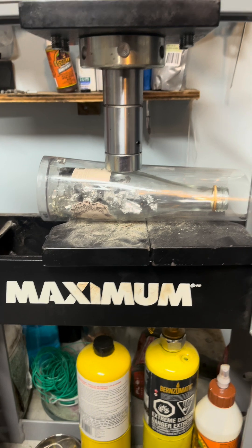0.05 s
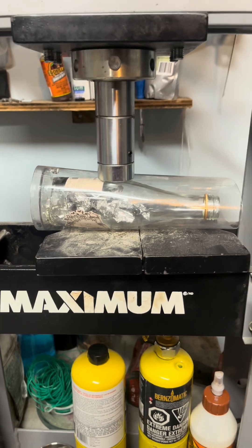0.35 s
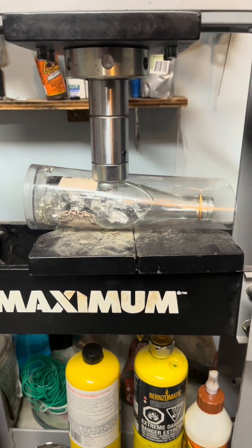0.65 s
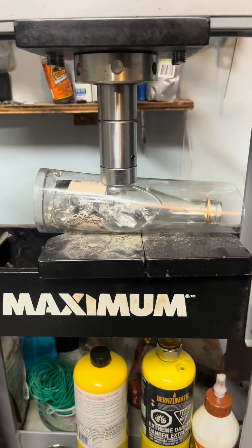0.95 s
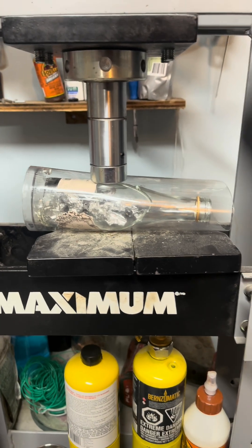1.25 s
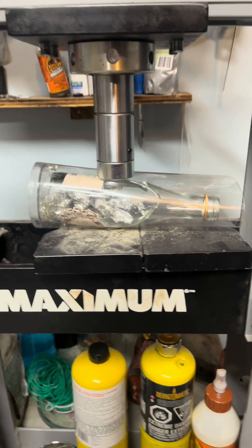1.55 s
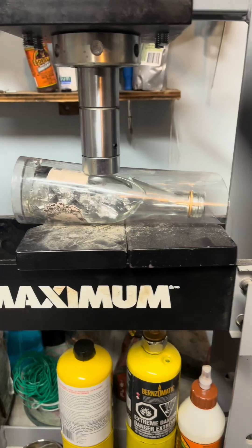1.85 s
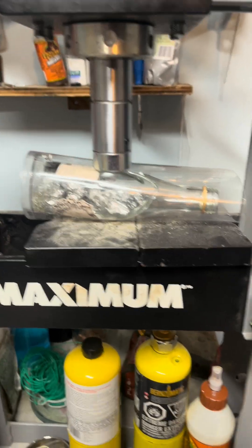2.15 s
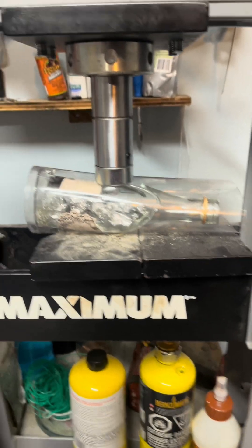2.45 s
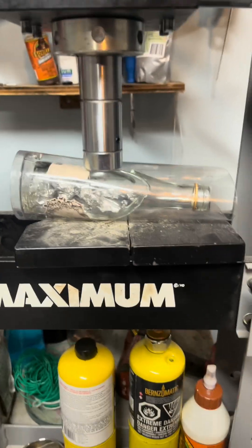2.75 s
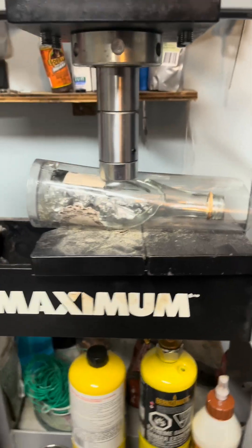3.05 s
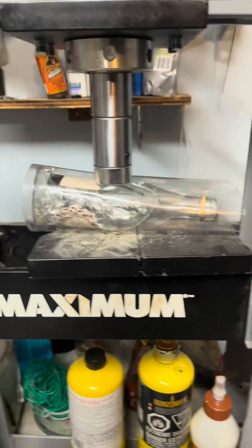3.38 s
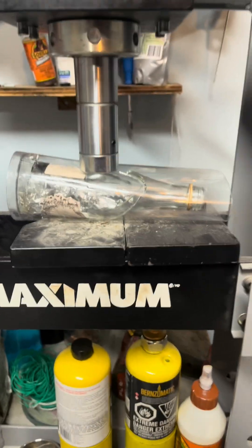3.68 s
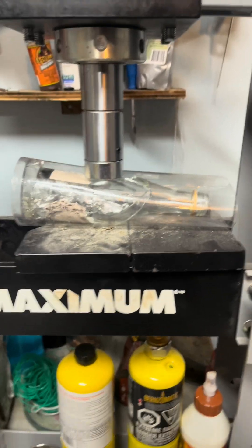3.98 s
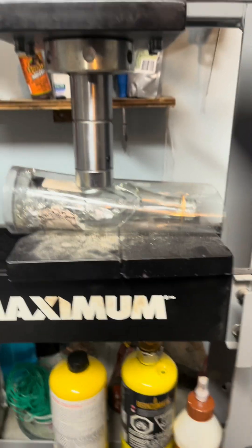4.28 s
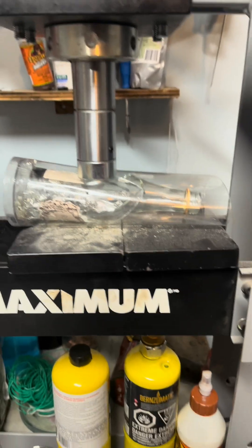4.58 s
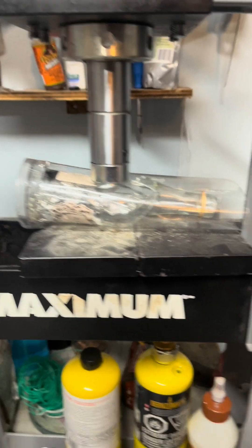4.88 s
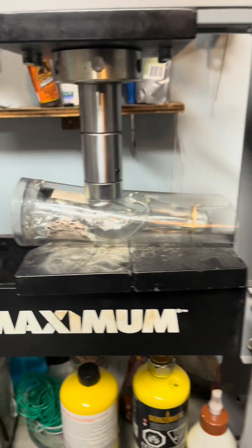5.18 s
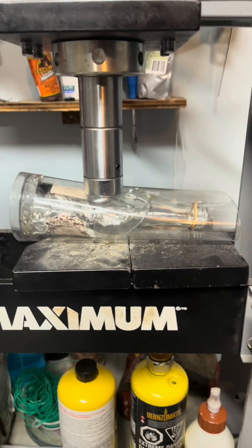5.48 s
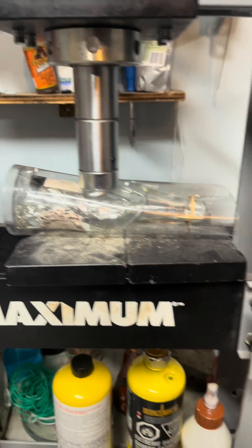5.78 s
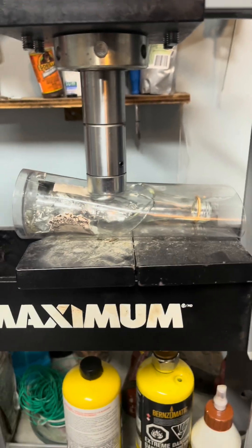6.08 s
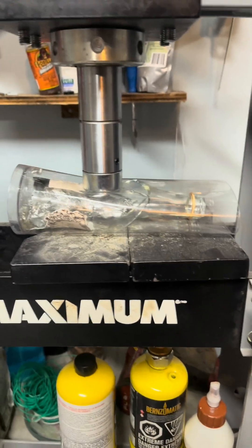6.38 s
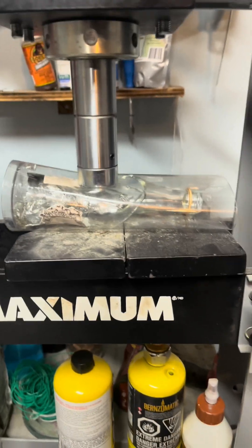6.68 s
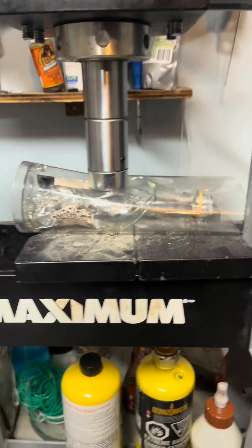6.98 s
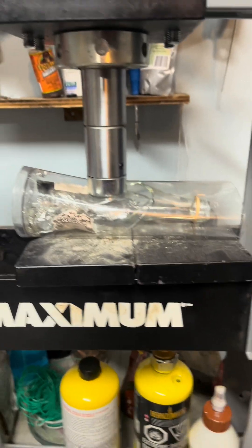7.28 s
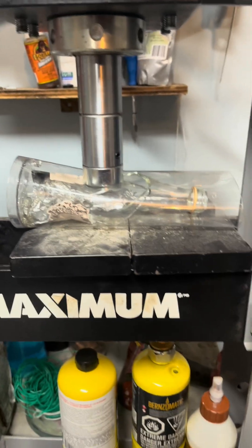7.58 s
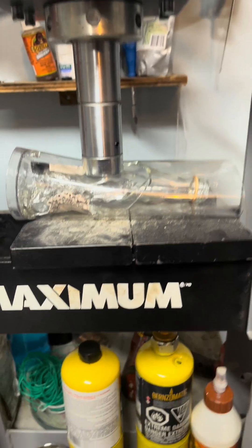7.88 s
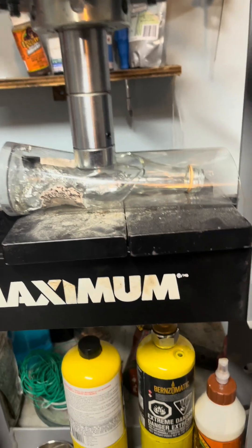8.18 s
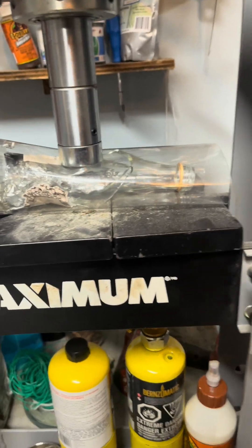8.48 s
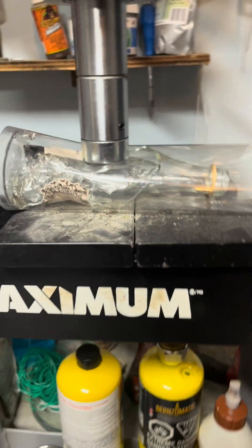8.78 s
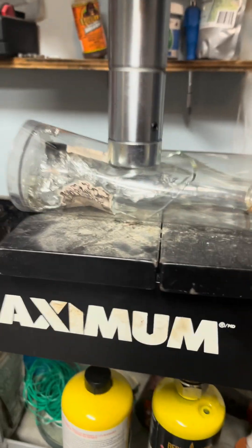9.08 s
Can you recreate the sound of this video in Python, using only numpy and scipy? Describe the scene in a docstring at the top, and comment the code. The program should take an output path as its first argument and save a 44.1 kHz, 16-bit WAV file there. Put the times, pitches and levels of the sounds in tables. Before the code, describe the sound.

A hand-pumped hydraulic press bears down on a glass bottle, close to the microphone in a small workshop with a faint rumble and hum. Sharp glass cracks and gritty grinding start at about 0.3 seconds, strongest in the first two seconds. The pumping settles into about two strokes a second, each a short hoarse squeak, a rattling knock of the frame and a bright clink of the steel handle. Smaller cracks continue throughout. Around 3.7 seconds the glass gives a sinking squeak, with loud dull knocks and a snap. From about 6.8 seconds it creaks under the load, and the pumping dies away after 7.2. Following a quieter moment, the glass rasps and squeals against the ram at 8.4 seconds, then gives way at 8.6 with a loud crunch. Shards ring briefly, the frame shudders, and a few soft knocks follow around 9 seconds.

```python
"""Bottle in a shop press

A small workshop, a phone microphone close to a hand-pumped hydraulic press bearing down on a bottle.
Strokes knock the steel frame and the handle clinks on its stop, over bench rumble and faint hum.
The glass cracks and grinds, creaks under the rising load, squeals on the ram and gives with a crunch."""
import sys
import numpy as np
from scipy import signal
from scipy.fft import rfft, irfft, next_fast_len
from scipy.io import wavfile
from scipy.ndimage import map_coordinates

SR = 44100
rng = np.random.default_rng(int(sys.argv[2]) if len(sys.argv) > 2 else 0)


def file_out(sig):
    """Save sig as 16-bit WAV at sys.argv[1]."""
    # one column per channel
    cols = np.atleast_2d(sig).T
    # limit, then scale
    lim = np.clip(cols, -1, 1)
    pcm = np.round(lim * 32767).astype(np.int16)
    wavfile.write(sys.argv[1], SR, pcm)


N = 407484
T = np.arange(SR // 2) / SR  # seconds within one event
CLOCK = np.arange(N) / SR  # seconds within the scene

# jolts to the frame, from the pump or the glass giving: start_s, knock_db, rattle_db, thud_db, sway_db
JOLTS = [(0.0, -61, -48.5, -45, -64.5), (0.334, -50.5, -32, -42.5, -63.5), (0.594, -52, -47, -44, -46),
         (0.79, -48.5, -44, -37, -53.5), (1.251, -46, -31.5, -42, -52), (1.786, -41.5, -26.5, -37.5, -66),
         (1.896, -42.5, -21.5, -35, -74), (2.28, -41.5, -26, -37, -50), (2.748, -40.5, -25, -36, -49),
         (3.22, -40.5, -26, -36, -49), (3.694, -39.5, -28.5, -34, -45), (4.144, -39, -28.5, -38, -48),
         (4.573, -40.5, -32, -35.5, -48.5), (5.013, -41, -27.5, -38, -45), (5.441, -38, -24, -35, -51),
         (5.857, -40.5, -21, -38, -47), (6.286, -41, -24.5, -33.5, -49), (6.713, -38, -26.5, -36.5, -39),
         (7.161, -42, -27.5, -34, -55), (7.364, -48.5, -34, -52, -73), (7.931, -49, -33, -40, -63)]
# the lever takes up its slack before a stroke: start_s, squeak_db, tick_db
LEVER_TAKEUPS = [(0.138, -53, -80.5), (0.259, -43, -49.5), (1.204, -46, -50.5), (1.743, -40, -55),
                 (2.235, -37.5, -55), (2.706, -35, -62), (3.182, -37.5, -42.5), (4.105, -37.5, -47),
                 (4.546, -34, -30), (4.974, -34, -40), (5.401, -37.5, -66), (5.82, -37, -39),
                 (6.247, -36, -39.5), (6.672, -34.5, -39), (7.12, -34, -39), (7.905, -45.5, -58)]
# the handle meets its stop: start_s, ring_db, snap_db, hold_s
HANDLE_CLINKS = [(0.8705, -26.5, -58, 0.0082), (1.49, -28.5, -42, 0.026), (2.4717, -21.5, -35, 0.011),
                 (2.9412, -28, -31, 0.022), (3.401, -23, -27.5, 0.0096), (3.8808, -24.5, -50.5, 0.012),
                 (4.3207, -26, -28.5, 0.014), (4.7427, -25.5, -36.5, 0.019), (5.171, -22, -61, 0.0048),
                 (5.5978, -22.5, -33, 0.011), (6.0286, -28, -32, 0.014), (6.4545, -25.5, -29.5, 0.016),
                 (6.8732, -24, -47.5, 0.0092)]
# evenly spaced dull knocks: first_s, last_s, count, first_db, last_db, pitch_hz
KNOCK_RUNS = [(0.005, 0.238, 3, -35, -50, 257), (3.704, 3.726, 2, -15.5, -21, 320),
              (3.716, 3.716, 1, -21, -21, 173), (3.82, 3.834, 2, -28, -34, 495),
              (3.857, 3.936, 4, -24, -34, 478), (7.582, 7.797, 3, -37.5, -39, 209),
              (7.881, 7.881, 1, -48, -48, 236), (8.059, 8.147, 2, -42, -48, 230),
              (8.982, 9.18, 5, -38, -32.5, 252)]
# spells of grinding as the ram advances: start_s, length_s, grit_db, fizz_db
GRIND_SPELLS = [(0.0, 0.011, -50.5, -75), (0.295, .04, -55.5, -65), (0.504, 0.15, -34, -35),
                (0.734, 0.037, -33, -51), (1.26, 0.16, -44, -41.5), (1.466, 0.029, -47, -45),
                (1.87, 0.1, -39, -46), (2.281, 0.13, -44, -44), (2.747, 0.11, -40.5, -51),
                (3.24, 0.14, -47.5, -54), (3.513, 0.171, -49.5, -60), (3.69, .105, -31, -47.5),
                (4.18, 0.12, -45.5, -45), (4.577, 0.23, -47, -52), (5.03, 0.17, -43, -47.5),
                (5.46, 0.093, -38.5, -40), (5.905, 0.14, -40, -50.5), (6.289, .13, -37.5, -35.5),
                (6.75, 0.14, -35, -39.5), (7.14, .18, -42, -46), (7.93, .11, -46, -51),
                (8.52, 0.12, -32.5, -38), (8.649, 0.15, -38.5, -56), (9.034, 0.23, -56, -65)]
# the course of one squeak of glass on steel: time_s, level_db, pitch_hz
DRAG_PATH = [(3.28, -56, 2120), (3.399, -39.5, 1980), (3.46, -53, 2000), (3.55, -48, 1990),
             (3.66, -38.5, 1960), (3.699, -30.5, 1900), (3.735, -33, 1850), (3.776, -25, 1780),
             (3.839, -56, 1420)]
# the glass creaks under load: start_s, length_s, rasp_db, squeal_db
CREAK_SPELLS = [(6.794, 0.037, -17.5, -31), (6.873, 0.042, -30.5, -44), (6.987, 0.015, -26.5, -33),
                (7.161, 0.14, -26.5, -38), (7.679, .09, -52.5, -59), (7.942, 0.093, -33, -48),
                (8.412, .205, -26.5, -35)]
# the glass slips on the ram: centre_s, peak_db, half_length_s
RAM_SLIPS = [(8.437, -23, 0.0028), (8.468, -19, 0.0036), (8.485, -15, 0.0034), (8.498, -21.5, 0.0066),
             (8.514, -31, 0.0047), (8.544, -14.5, 0.0067), (8.592, -15, 0.0051), (8.616, -14, 0.0036)]
# the clearest cracks of the loaded glass: start_s, body_db, treble_db, t60_s
GLASS_CRACKS = [(0.336, -25.5, -33, .035), (0.37, -34, -33.5, 0.054), (0.464, -38, -40, 0.09),
                (0.5015, -16.5, -17, .07), (0.592, -16, -17.5, 0.059), (0.697, -19, -27, .1),
                (0.714, -29.5, -32, 0.13), (0.739, -25.5, -41, 0.057), (0.757, -19.5, -61, .075),
                (0.846, -23, -33.5, 0.078), (0.912, -33.5, -40, 0.11), (1.034, -43.5, -53, .065),
                (1.073, -45.5, -51, 0.14), (1.138, -42, -46.5, .06), (1.227, -32.5, -38.5, 0.2),
                (1.287, -21, -27, 0.085), (1.313, -30, -34, .1), (1.337, -33, -34, .065),
                (1.39, -44, -34.5, .12), (1.419, -27, -30, 0.055), (1.657, -57, -46, 0.05),
                (1.851, -30, -31, 0.41), (1.89, -15, -15.5, 0.039), (1.908, -23.5, -26, 0.057),
                (1.967, -30.5, -40, 0.11), (2.39, -53, -30, 0.053), (2.791, -34, -35.5, 0.098),
                (2.838, -26.5, -40.5, .08), (3.322, -37.5, -45, 0.087), (3.668, -31.5, -45, 0.23),
                (3.799, -21, -26, 0.027), (4.445, -56, -50, .06), (4.641, -37, -33, .12),
                (4.657, -30.5, -34, .04), (4.689, -49, -34.5, 0.033), (4.82, -51, -50, 0.086),
                (5.046, -29.5, -32, 0.078), (5.073, -24, -31, .08), (5.311, -40, -53.5, .08),
                (5.345, -36, -44.5, 0.057), (5.513, -26, -38, 0.087), (5.545, -29, -42, 0.069),
                (5.738, -60, -49.5, .08), (5.89, -30.5, -32.5, .22), (5.942, -31, -27.5, 0.1),
                (5.986, -46, -35, 0.073), (6.123, -39, -37, .04), (6.343, -25.5, -26, 0.28),
                (6.424, -30, -41.5, .09), (6.721, -32, -33, .1), (6.756, -25.5, -29.5, 0.093),
                (6.79, -22.5, -25.5, 0.18), (6.812, -22, -41, 0.032), (6.923, -29.5, -41, .06),
                (6.991, -27, -40, 0.048), (7.378, -33, -40.5, 0.053), (7.451, -37, -52, 0.066),
                (7.55, -42.5, -54, .05), (7.59, -42, -53, 0.047), (8.401, -36.5, -45, 0.088),
                (9.043, -46.5, -58, 0.13)]
# deep fractures through the wall, most as the bottle gives way: start_s, level_db, t60_s
WALL_FRACTURES = [(0.758, -22, 0.022), (3.857, -20, 0.0073), (4.735, -34, 0.0085), (8.623, -10.5, 0.0095),
                  (8.634, -12.5, 0.071), (8.639, -14, 0.053), (8.647, -13.5, 0.05), (8.663, -14, 0.067),
                  (8.667, -25, 0.048), (8.671, -22, .04), (8.683, -17, 0.03), (8.701, -28, 0.038),
                  (8.726, -22, 0.05), (8.776, -32, 0.049)]

# ringing modes: pitch_hz, level_db, t60_s
HANDLE_MODES = [(1587, 4, 0.087), (1846, 3.5, 0.089), (2620, -3, 0.16), (2644, -10.5, 0.099),
                (3193, 1, 0.13), (3100, -17.5, 0.13), (5400, -18, 0.13), (6180, 2.5, 0.07),
                (6500, -5.5, 0.09), (7930, 7.5, 0.047)]
SHARD_MODES = [(1333, -2, 0.54), (1910, -12, 0.76), (2225, -5, 0.4), (2225, 3, .45), (2230, -18, 0.36),
               (2560, -21, 0.36), (2730, -5, 0.15), (2915, 1.5, 0.24), (3820, -1.5, 0.38),
               (3830, -24, 0.46)]
# driven resonances: centre_hz, width_hz, level_db
FRAME_MODES = [(206, 42, -9), (321.5, 35, 2.5), (386.5, 51, 0), (463, 116, -14.5), (717, 276, -15)]
BOTTLE_MODES = [(378, 105, -14.5), (1060, 81, -3), (2030, 150, -7.5), (2760, 55, -11), (6050, 390, -30),
                (7000, 220, -17.5)]
# the workshop's reverberation: frequency_hz, t60_s
ROOM_DECAY = [(100, 0.93), (260, 0.81), (700, 0.5), (1800, 0.45), (5000, 0.48), (13000, 0.2)]

# noise spectra: frequency_hz, density_db
RUMBLE_SPECTRUM = [(20, -36), (40, -2.5), (64, 5.5), (110, -0.5), (150, -24.5), (200, -1.5), (400, -16.5),
                   (600, -19), (1300, -89)]  # the low bed under everything
BENCH_SPECTRUM = [(15, -52.5), (25, -12), (64, -1), (112, -0.5), (130, -3), (151, -49), (194, 5.5),
                  (274, -4), (313, -1.5), (343, 2), (372, 0), (403, -3), (600, -14), (780, -55),
                  (1320, -120)]  # the bench shaking after a jolt
RATTLE_SPECTRUM = [(260, -7), (450, -0.5), (589, -13), (771, 2.5), (1140, -10), (1580, 1.5), (1860, -4.5),
                   (2190, -2.5), (3230, -6.5), (4840, -27), (6340, -13.5), (10500, -37.5), (15100, -22.5),
                   (16000, -36)]  # the pump linkage
CLINK_SPECTRUM = [(530, -47.5), (1050, -12), (1300, 1), (1620, 0), (2100, 2.5), (2950, -0.5), (3250, 0),
                  (4400, -12), (6200, -3), (7900, -8), (8400, -13), (11300, -24.5), (13500, -9.5),
                  (15700, -16)]  # the bright body of a clink
GRIT_SPECTRUM = [(260, -45), (450, -4.5), (539, -6), (775, 0.5), (911, -5.5), (1080, -4), (1210, -5.5),
                 (1550, -4), (2350, 0.5), (2570, 0.5), (3210, -7), (3810, -8.5), (5000, -17.5), (6500, -39),
                 (11000, -120)]  # coarse chips
FIZZ_SPECTRUM = [(2650, -21.5), (4500, -4.5), (5240, -6.5), (7100, -4.5), (8140, -10), (9370, -16.5),
                 (11200, -20), (13700, -5.5), (15700, -10.5), (16200, -23.5), (16500, -38)]  # powdered glass
SCRAPE_SPECTRUM = [(760, -20), (1300, -4.5), (1640, -5.5), (2150, -11.5), (2440, -23), (2750, -8.5),
                   (5260, -14), (7050, -12.5), (8700, -27.5), (10500, -29.5), (12600, -22.5),
                   (14400, -30.5), (15300, -19.5), (16000, -34)]  # glass sticking and slipping
CRACK_SPECTRUM = [(150, -21.5), (250, -31.5), (350, 10.5), (560, -11), (800, -2.5), (1080, 7), (1600, -4),
                  (2150, 5.5), (2420, 0.5), (2750, 3.5), (3250, 1.5), (3900, -15), (5000, -13.5),
                  (8000, -60.5)]  # the body of a crack
SNAP_SPECTRUM = [(2240, -7.5), (3800, -3.5), (4800, 0), (5230, -7.5), (6250, 1), (7070, 0.5), (10900, -15),
                 (13700, -0.5), (15700, -9.5), (16200, -12), (16500, -35.5)]  # the treble edge of cracks, clinks and ticks
CRUNCH_SPECTRUM = [(180, -42), (300, -14), (412, -1.5), (511, -16.5), (856, -16), (978, -9.5), (1660, -9),
                   (2740, 1.5), (3400, -15), (3700, -15), (5340, -24), (7690, -20), (10900, -47),
                   (14200, -34), (16000, -55)]  # the wall fracturing
SHUDDER_SPECTRUM = [(30, -19), (80, 2.5), (150, -5), (220, -9), (360, -1.5), (520, -14.5), (1000, -15.5),
                    (3000, -79)]  # the frame springing back
ROCKING_SPECTRUM = [(30, -40), (50, 4), (85, 9), (150, -5), (220, 4), (370, -12), (600, -11), (1300, -80)]  # the bench as the load lets go
THUD_SPECTRUM = [(30, -17), (70, 5), (115, 12), (220, -8), (400, -43.5), (900, -89)]
AIR_SPECTRUM = [(300, -0.5), (2500, -1.5), (4500, -16), (8000, -20), (14000, -31.5)]


def amp(db):
    """Decibels to gain."""
    return 10 ** (np.asarray(db) / 20)


def unit(x):
    """x at rms 1."""
    return x / np.sqrt(np.mean(x ** 2) + 1e-20)


def along(points, hz):
    """A curve of (frequency_hz, value) points, read on a log axis."""
    frequencies, values = np.transpose(points)
    return np.interp(np.log(hz + 1), np.log(frequencies + 1), values)


def add(track, s, sound):
    """Mix a sound into the track at s seconds."""
    part = track[max(round(s * SR), 0):][:len(sound)]
    part += sound[:len(part)]


def drift(rate, size=N):
    """A smooth random curve, rate knots a second."""
    knots = rng.standard_normal(int(size * rate / SR) + 4)
    steps = np.arange(0, len(knots), .125)
    curve = map_coordinates(knots, [steps], mode="nearest")
    return np.interp(np.arange(size) * rate / SR, steps, curve)


def filtered(x, response):
    """x times a complex response of frequency."""
    size = next_fast_len(len(x) + 2048, real=True)
    return irfft(rfft(x, size) * response(np.fft.rfftfreq(size, 1 / SR)), size)[:len(x)]


def coloured(x, spectrum):
    """x shaped by a spectrum, at rms 1."""
    return unit(filtered(x, lambda hz: amp(along(spectrum, hz))))


def resonate(x, modes):
    """x through parallel resonances of alternating sign, at rms 1."""
    def response(hz):
        return sum((-1) ** k * amp(db) * 1j * hz * width / (centre ** 2 - hz ** 2 + 1j * hz * width)
                   for k, (centre, width, db) in enumerate(modes))
    return unit(filtered(x, response))


def fade(attack, hold, t60):
    """The envelope of one blow; times in seconds."""
    return (1 - np.exp(-T / attack)) * amp(-60 * np.maximum(T - hold, 0) / max(t60, .004))


def spells(rows, attack, t60, growth_db_per_s=0):
    """A gain curve from (start_s, length_s, level_db) rows: each rises, holds and dies away."""
    gain = np.zeros(N)
    for s, length, db in rows:
        add(gain, s, amp(db + growth_db_per_s * np.minimum(T, length)) * fade(attack, length, t60))
    return gain


def activity(s):
    """Gain of the small stirrings: 1 during steady pumping, lower before and after."""
    return amp(np.interp(s, [.2, .3, 7.5, 7.92], [-14, 0, 0, -14]))


def grains(rate, spread_db):
    """Tiny impulses of uneven strength at random moments, about rate a second."""
    impulses = (rng.random(N) < rate / SR) * rng.standard_normal(N)
    return impulses * amp(spread_db * np.minimum(rng.exponential(size=N), 4))


def burst(spectrum, attack, hold, t60, ripple_db=2.8):
    """A dying spray of micro-contacts; each contact point favours its own resonances."""
    size = min(len(T), int((hold + 1.3 * t60) * SR) + 512)
    grid_hz = np.arange(0, SR / 2, 190)
    ripple = ripple_db * rng.standard_normal(len(grid_hz))
    noise = rng.standard_normal(len(T))[:size]
    spray = filtered(noise, lambda hz: amp(along(spectrum, hz) + np.interp(hz, grid_hz, ripple)))
    return np.pad(unit(spray), (0, len(T) - size)) * fade(attack, hold, t60)


def rough_tone(pitch, width_hz):
    """A fuzzy tone at rms 1: a band of noise carried along a pitch curve."""
    flutter = drift(width_hz, len(pitch)) + 1j * drift(width_hz, len(pitch))
    return unit(np.real(flutter * np.exp(2j * np.pi * np.cumsum(pitch) / SR)))


def ring(modes, width_hz):
    """Struck modes, blurred by loose contact and new at every strike."""
    t = T[:int(max(t60 for _, _, t60 in modes) * SR)]
    waves = sum(amp(db - 60 * t / t60) * rough_tone(np.full(len(t), hz), width_hz)
                for hz, db, t60 in modes)
    return waves / np.linalg.norm([amp(db) for _, db, _ in modes]) * (1 - np.exp(-t / .0002))


def dull_knock(hz):
    """A soft knock whose pitch drops an octave to hz."""
    t = T[:SR // 8]
    pitch = hz * (1 + np.exp(-t / .004))
    tone = np.sin(2 * np.pi * np.cumsum(pitch) / SR) + .2 * rough_tone(pitch, width_hz=260)
    return tone * fade(attack=.0012, hold=.004, t60=12 / hz)[:len(t)]


def room_tone():
    """The bed of the place: a faint hiss of air, wandering rumble and a little mains hum."""
    air = amp(-65.5) * coloured(rng.standard_normal(N), AIR_SPECTRUM)
    rumble = amp(-56 + 3 * drift(7.1)) * coloured(rng.standard_normal(N), RUMBLE_SPECTRUM)
    hum = amp(-62.5 + 2 * drift(1.2)) * np.sin(2 * np.pi * 120 * CLOCK)
    return air + rumble + hum


def workshop_reverb(x):
    """The room's answer, each frequency dying at its own speed; it shifts as the microphone moves."""
    out = np.zeros(N)
    hop = SR // 3  # a fresh tail for each block
    for start in range(0, N, hop):
        hz, t, noise = signal.stft(rng.standard_normal(len(T)), SR, nperseg=256)
        decay = amp(-60 * t / along(ROOM_DECAY, hz)[:, None])
        _, tail = signal.istft(noise * decay, SR, nperseg=256)
        tail = tail[:len(T)] * (1 - np.exp(-T / .00033))
        add(out, start / SR, signal.fftconvolve(x[start:start + hop], tail / np.linalg.norm(tail)))
    return out


def bench():
    """The bench goes on shaking after each jolt, over a patter of faint dull knocks."""
    sway = spells([(s, .25, db) for s, *_, db in JOLTS], attack=.04, t60=.49)
    patter = np.zeros(N)
    starts = np.cumsum(rng.uniform(.04, .11, size=130))
    for s, db in zip(starts, rng.normal(-46.5, 2.5, len(starts))):
        add(patter, s, amp(db) * activity(s) * dull_knock(216))
    return patter + sway * coloured(rng.standard_normal(N), BENCH_SPECTRUM)


def knock_runs():
    """Dull knocks, single or in even runs that swell or fade."""
    out = np.zeros(N)
    for first, last, count, first_db, last_db, hz in KNOCK_RUNS:
        for s, db in np.linspace((first, first_db), (last, last_db), count):
            add(out, s, amp(db) * dull_knock(hz * rng.normal(1, .025)))
    return out


def lever():
    """The pivot stirs, then ticks and gives a short hoarse squeak that falls in pitch."""
    out = np.zeros(N)
    stir_lead_s, stir_db = .052, -11
    for s, squeak_db, tick_db in LEVER_TAKEUPS:
        for start, db in [(s - stir_lead_s, squeak_db + stir_db), (s, squeak_db)]:
            pitch = 1450 * rng.normal(1, .04) * (.6 + .4 * np.exp(-T / .033))
            squeak = amp(-4) * rough_tone(pitch, width_hz=650)
            squeak += amp(-1.5) * rough_tone(2 * pitch, width_hz=830)
            add(out, start, amp(db) * squeak * fade(attack=.0028, hold=.009, t60=.21))
        add(out, s, amp(squeak_db) * burst(RATTLE_SPECTRUM, attack=.0022, hold=.044, t60=.17))
        add(out, s, amp(tick_db) * burst(SNAP_SPECTRUM, attack=.0005, hold=.0017, t60=.054))
    return out


def frame_jolts():
    """Each jolt rattles the linkage, knocks the frame and then thuds into the bench."""
    out = np.zeros(N)
    thud_lag_s = .0275
    for s, knock_db, rattle_db, thud_db, _ in JOLTS:
        add(out, s, amp(rattle_db) * burst(RATTLE_SPECTRUM, attack=.0014, hold=.0098, t60=.11))
        steel = resonate(rng.standard_normal(len(T)), FRAME_MODES)
        add(out, s, amp(knock_db) * unit(steel * fade(attack=.0021, hold=.03, t60=.11)))
        thud = burst(THUD_SPECTRUM, attack=.0022, hold=.0098, t60=.38)
        add(out, s + thud_lag_s, amp(thud_db) * thud)
    return out


def handle():
    """The steel handle meets its stop: a bright clink, held for a moment before it rings away."""
    out = np.zeros(N)
    strike = 1 + .9 * np.exp(-T / .005)
    for s, ring_db, snap_db, hold_s in HANDLE_CLINKS:
        add(out, s, amp(snap_db) * burst(SNAP_SPECTRUM, attack=.000517, hold=.0022, t60=.06))
        clink = strike * burst(CLINK_SPECTRUM, attack=.0027, hold=hold_s, t60=.068)
        add(out, s, amp(ring_db - 4.5) * clink)
        add(out, s, amp(ring_db) * ring(HANDLE_MODES, width_hz=56))
    return out


def chips(low_hz, high_hz, life_s, spread_db=3, count=14000):
    """Tiny glass chips ping at random moments, each with its own pitch and size; at rms 1."""
    when, pitch, size = rng.random((count, 3)).T[:, :, None]
    age = np.arange(int(4 * life_s * SR))  # samples
    hz = low_hz + pitch * (high_hz - low_hz)
    pings = np.exp(-age / (life_s * SR)) * np.sin(2 * np.pi * hz * age / SR)
    strength = amp(-spread_db * np.log(np.maximum(size, .02)))
    positions = (when * N).astype(int) + age
    return unit(np.bincount(positions.ravel(), (strength * pings).ravel(), N)[:N])


def grinding():
    """Crushed glass rubs as the ram advances: coarse grit and a powdery fizz, full of tiny chips."""
    grit_gain = spells([(s, length, db) for s, length, db, _ in GRIND_SPELLS], attack=.019, t60=.36)
    fizz_gain = spells([(s, length, db) for s, length, _, db in GRIND_SPELLS], attack=.019, t60=.22)
    # settling shards trickle on between the spells
    grit_gain += amp(-58) * activity(CLOCK)
    fizz_gain += amp(-65.5) * activity(CLOCK)
    # each little collapse flares up at once and dies within milliseconds
    collapses = np.abs(grains(rate=110, spread_db=2))
    flares = unit(signal.lfilter([1], [1, -np.exp(-1 / (.004 * SR))], collapses))
    coarse = chips(300, 6000, life_s=.0008)
    fine = chips(4000, 16000, life_s=.0002)
    grit = coloured((coarse + rng.standard_normal(N)) * (1 + .16 * flares), GRIT_SPECTRUM)
    fizz = coloured((.5 * fine + rng.standard_normal(N)) * (.5 + flares), FIZZ_SPECTRUM)
    return grit_gain * grit + fizz_gain * fizz


def drag():
    """Glass shifts under the ram: a thin squeak that sinks, hoarser the louder it gets."""
    s, db, hz = np.transpose(DRAG_PATH)
    level = amp(np.interp(CLOCK, s, db, left=-120, right=-120))
    pitch = np.interp(CLOCK, s, hz)
    hoarseness = (level / level.max()) ** .27
    thin = (1 - hoarseness) * rough_tone(pitch, width_hz=190)
    hoarse = hoarseness * rough_tone(pitch, width_hz=1600)
    overtone = amp(-13) * rough_tone(1.38 * pitch, width_hz=600)
    return level * (thin + hoarse + overtone)


def creaks():
    """Stick-slip rasps the bottle; a wavering squeal joins each creak and flares in short, loud slips."""
    shape = dict(attack=.011, t60=.054, growth_db_per_s=13.5)  # a creak grows as the load builds
    load = spells([(s, length, db) for s, length, db, _ in CREAK_SPELLS], **shape)
    squeal_gain = spells([(s, length, db) for s, length, _, db in CREAK_SPELLS], **shape)
    rasp = amp(-3) * resonate(grains(rate=5000, spread_db=3.5), BOTTLE_MODES)
    slip_hz = 1080 * (1 + .0283 * drift(160))
    phase = 2 * np.pi * np.cumsum(slip_hz) / SR
    pulses = rng.standard_normal(N) * (1 + np.cos(phase)) ** 2  # one for every slip cycle
    scrape = amp(-8.5) * coloured(pulses * amp(1.2 * drift(200)), SCRAPE_SPECTRUM)
    slips = sum(amp(db) * np.exp(-.5 * ((CLOCK - s) / width) ** 2) for s, db, width in RAM_SLIPS)
    tone = np.sin(phase) + amp(-11.5) * np.sin(2 * phase)
    squeal = np.hypot(slips, squeal_gain * amp(1.8 * drift(60))) * tone
    return load * (rasp + scrape) + squeal


def cracks():
    """A crack snaps, then its faces crumble for a moment; each spell of grinding adds one stray tick."""
    out = np.zeros(N)
    ticks = [(s + rng.random() * length, grit_db + 2, fizz_db + 3.5, .06)
             for s, length, grit_db, fizz_db in GRIND_SPELLS]
    snap = 1 + .61 * np.exp(-T / .0025)
    for s, body_db, treble_db, t60 in list(GLASS_CRACKS) + ticks:
        body = amp(body_db) * burst(CRACK_SPECTRUM, attack=.0007, hold=.0033, t60=t60)
        treble = amp(treble_db) * burst(SNAP_SPECTRUM, attack=.00049, hold=.0031, t60=1.06 * t60)
        add(out, s, snap * (body + treble))
    return out


def fractures():
    """Brittle breaks; the last run rings the shards, and the freed frame shudders and rocks the bench."""
    out = np.zeros(N)
    for s, db, t60 in WALL_FRACTURES:
        add(out, s, amp(db) * burst(CRUNCH_SPECTRUM, attack=.00067, hold=.0018, t60=t60, ripple_db=4.5))
    add(out, 8.636, amp(-21) * ring(SHARD_MODES, width_hz=67))
    add(out, 8.66, amp(-26) * burst(SHUDDER_SPECTRUM, attack=.0046, hold=.11, t60=.37, ripple_db=-2.5))
    add(out, 8.74, amp(-44) * burst(ROCKING_SPECTRUM, attack=.02, hold=.08, t60=1.3))
    return out


def scene():
    """Press and glass close to the microphone, the workshop behind them, in mono."""
    press = frame_jolts() + lever() + handle()
    glass = cracks() + grinding() + creaks() + drag() + fractures()
    near = press + glass + knock_runs()
    return (amp(-2.5) * near + amp(-11.5) * workshop_reverb(near) + room_tone() + bench())[None]


def record(dry):
    """The phone microphone rolls off the deepest bass and keeps nothing above its band limit."""
    low_hz, top_hz = 34, 15900
    return np.array([filtered(x, lambda hz: (hz < top_hz) * hz ** 4 / (hz ** 4 + low_hz ** 4))
                     for x in dry])


dry = scene()
out = record(dry)
file_out(out)
```